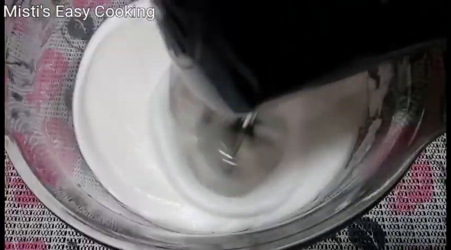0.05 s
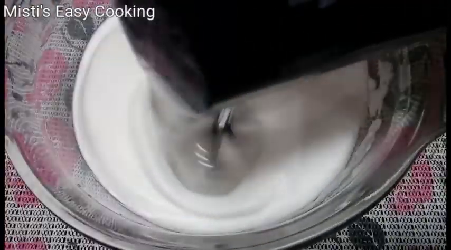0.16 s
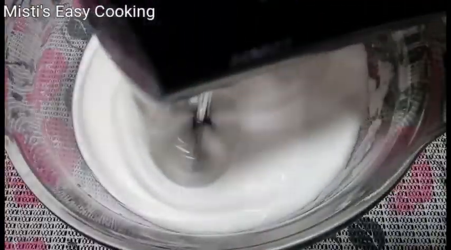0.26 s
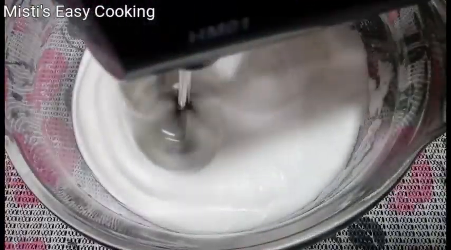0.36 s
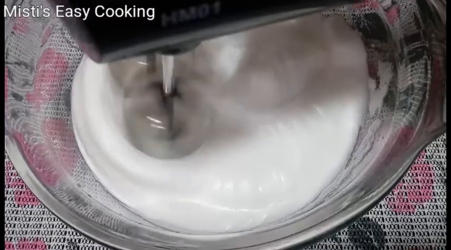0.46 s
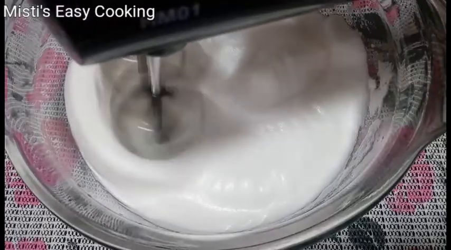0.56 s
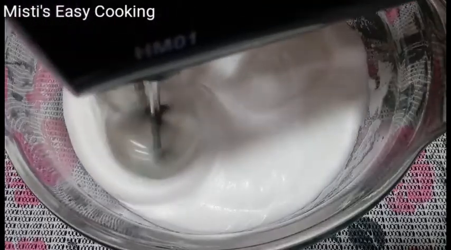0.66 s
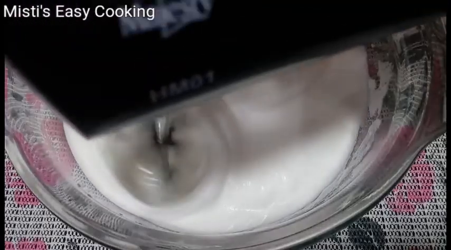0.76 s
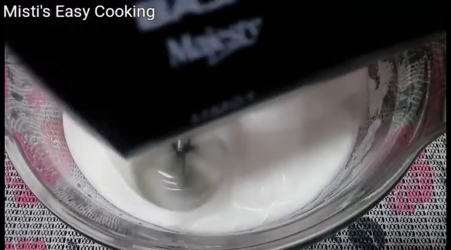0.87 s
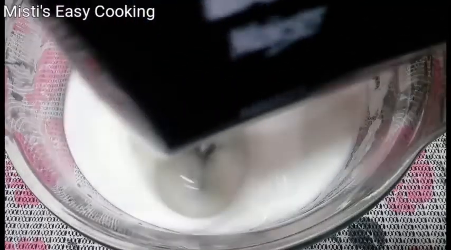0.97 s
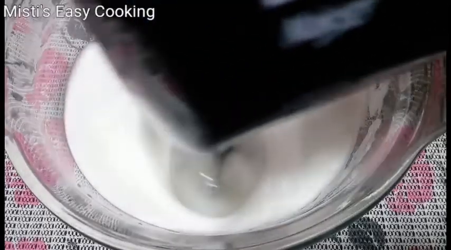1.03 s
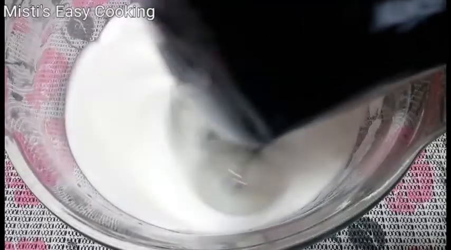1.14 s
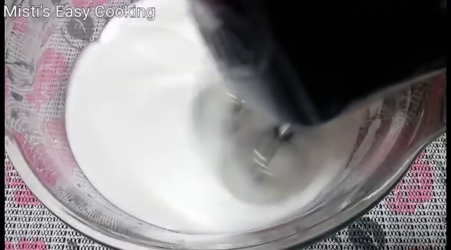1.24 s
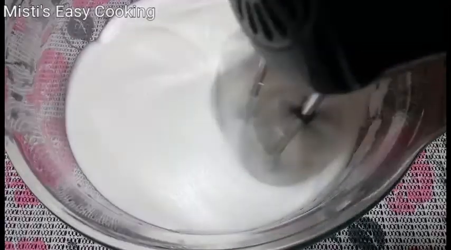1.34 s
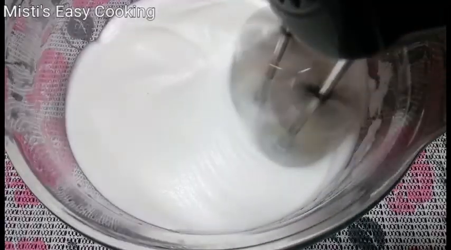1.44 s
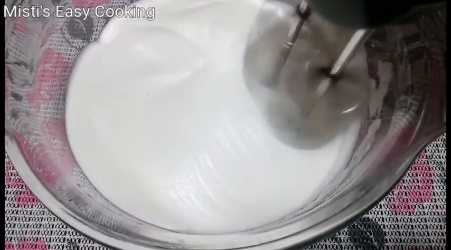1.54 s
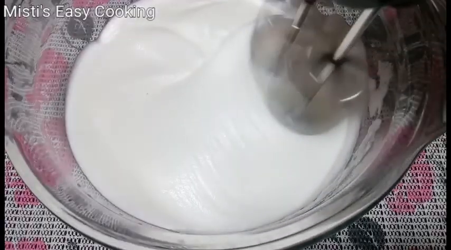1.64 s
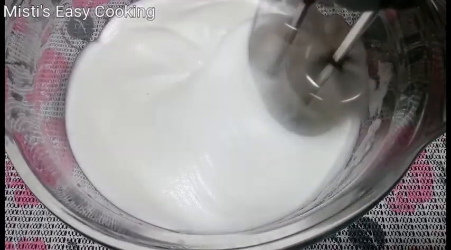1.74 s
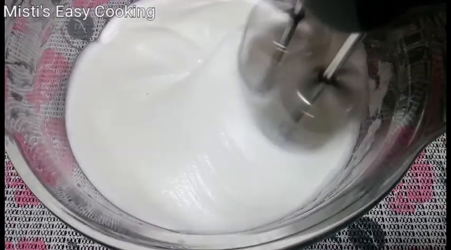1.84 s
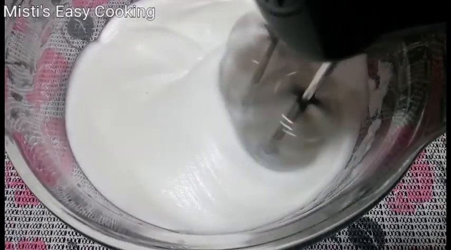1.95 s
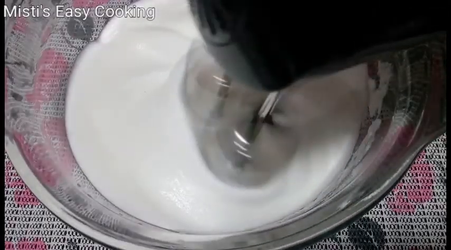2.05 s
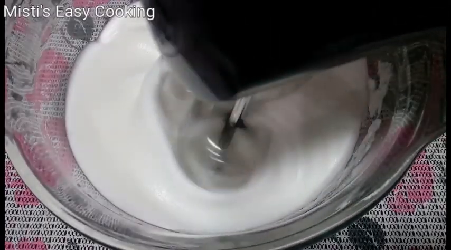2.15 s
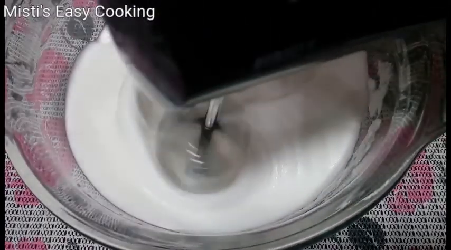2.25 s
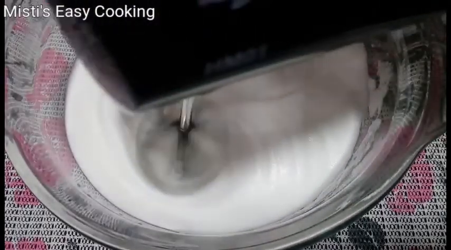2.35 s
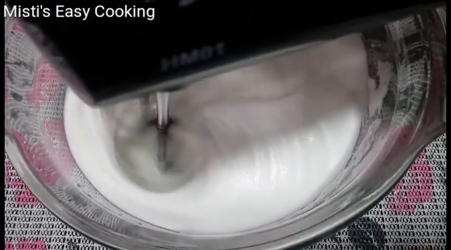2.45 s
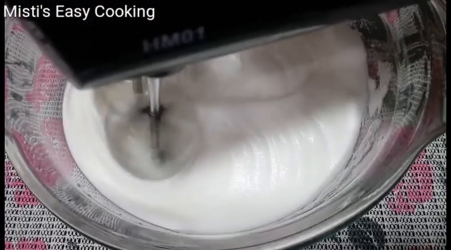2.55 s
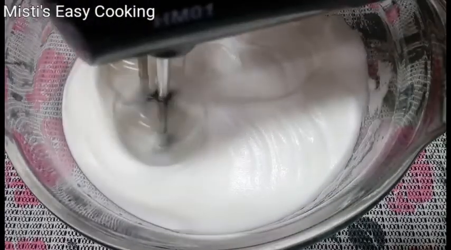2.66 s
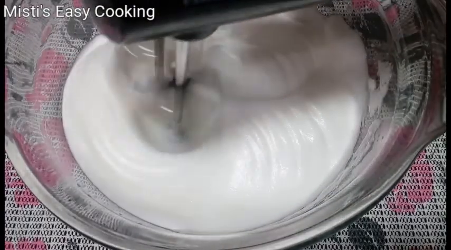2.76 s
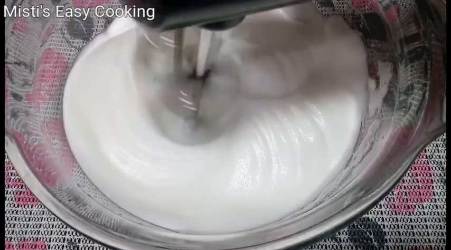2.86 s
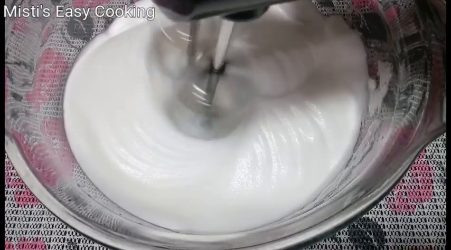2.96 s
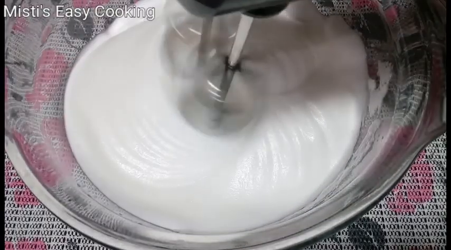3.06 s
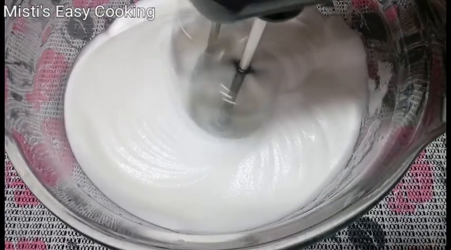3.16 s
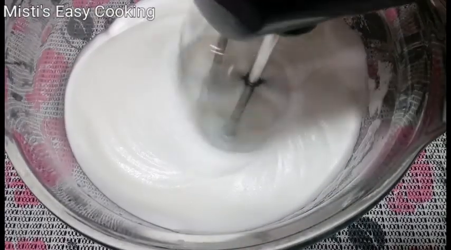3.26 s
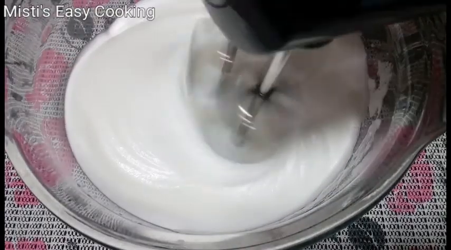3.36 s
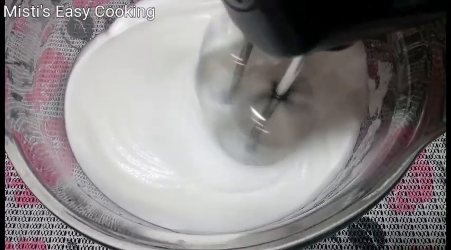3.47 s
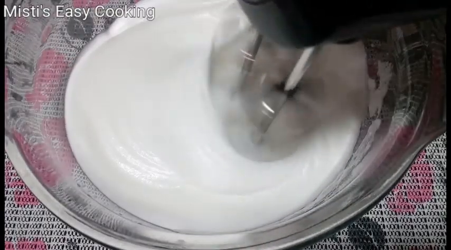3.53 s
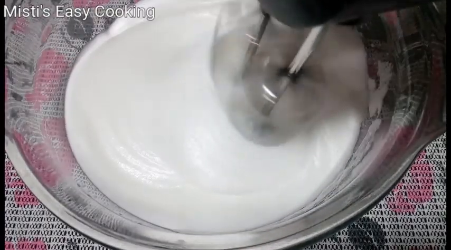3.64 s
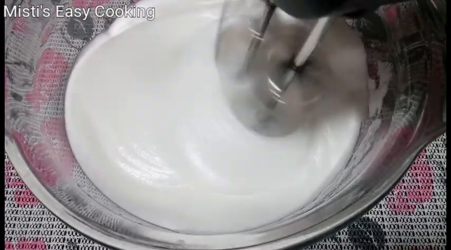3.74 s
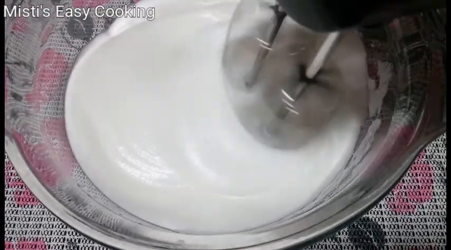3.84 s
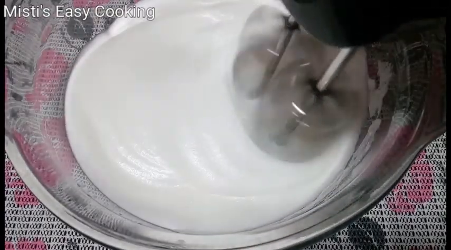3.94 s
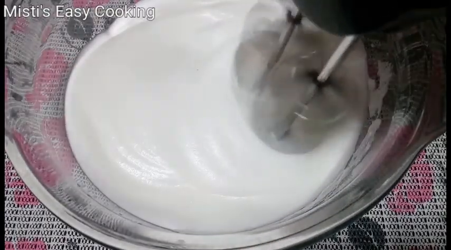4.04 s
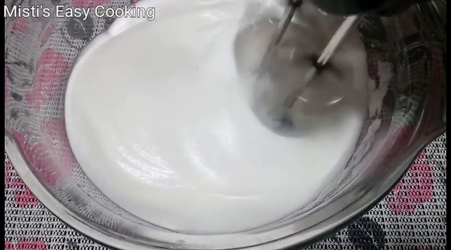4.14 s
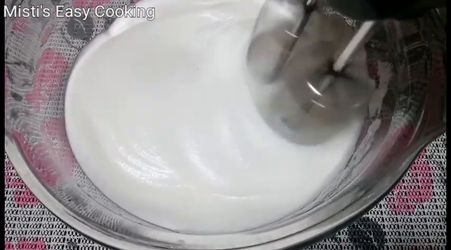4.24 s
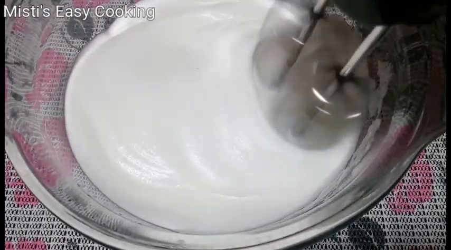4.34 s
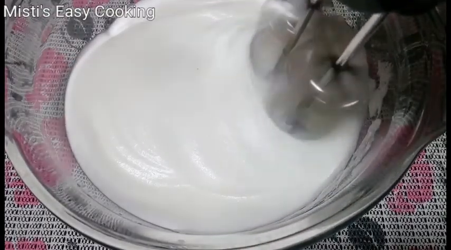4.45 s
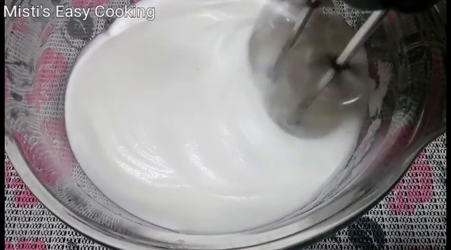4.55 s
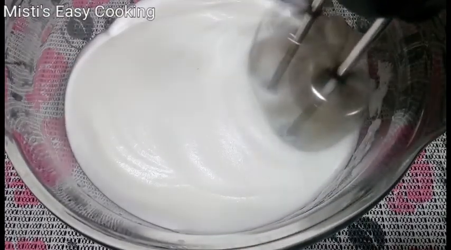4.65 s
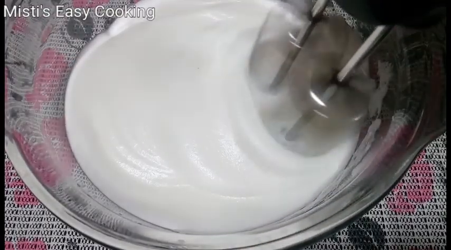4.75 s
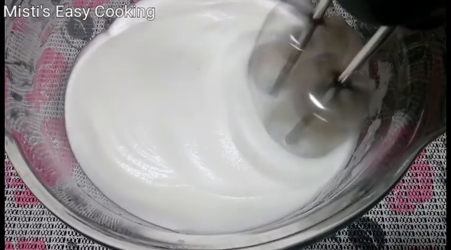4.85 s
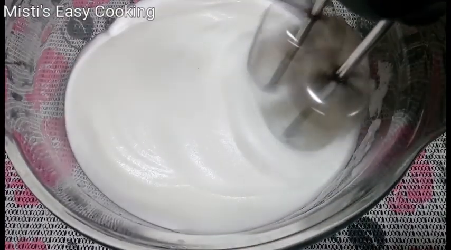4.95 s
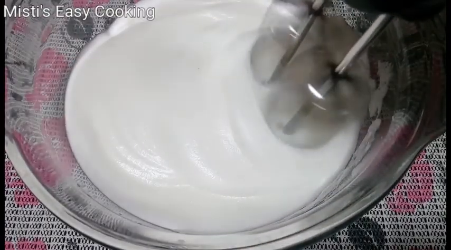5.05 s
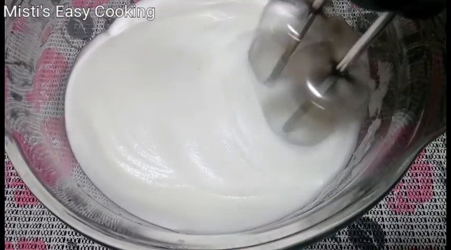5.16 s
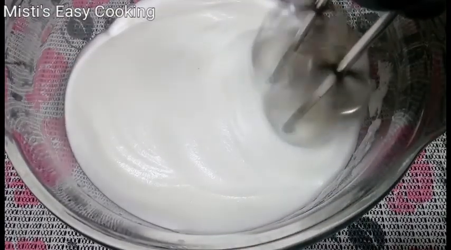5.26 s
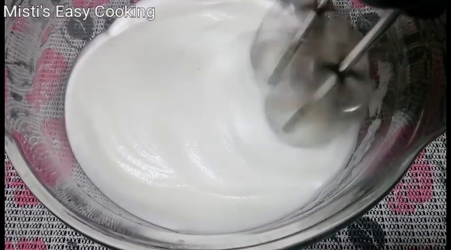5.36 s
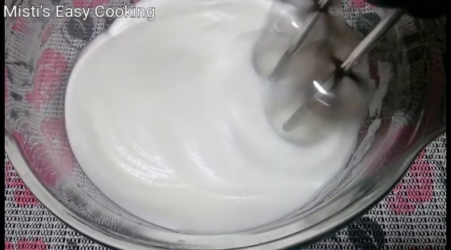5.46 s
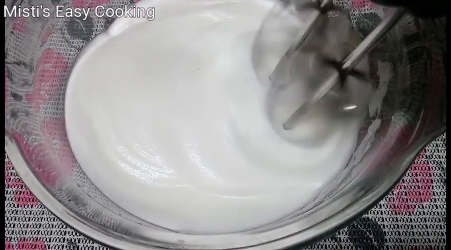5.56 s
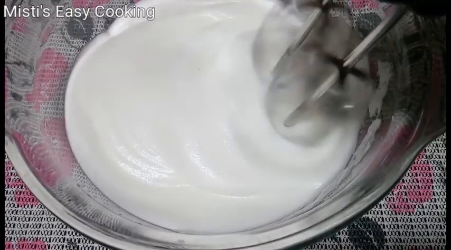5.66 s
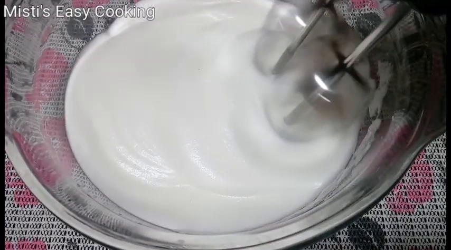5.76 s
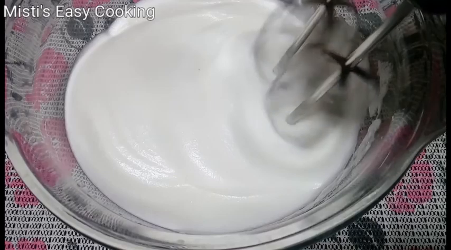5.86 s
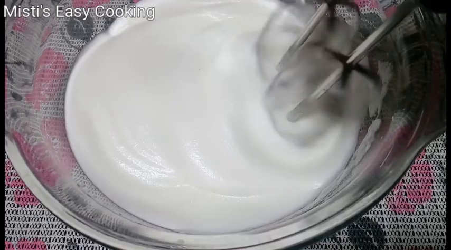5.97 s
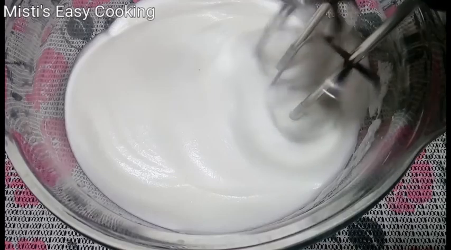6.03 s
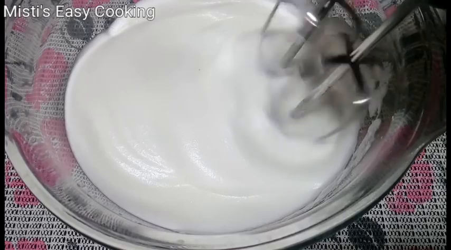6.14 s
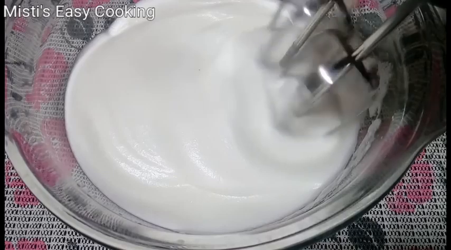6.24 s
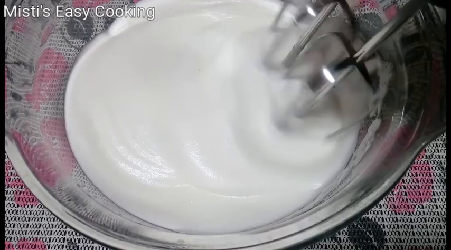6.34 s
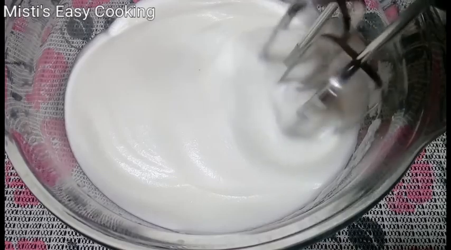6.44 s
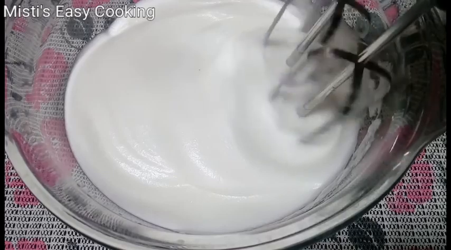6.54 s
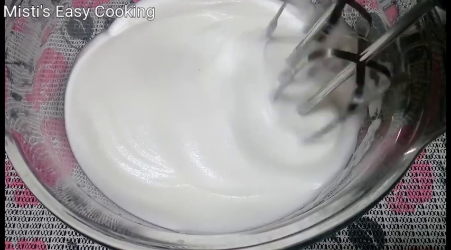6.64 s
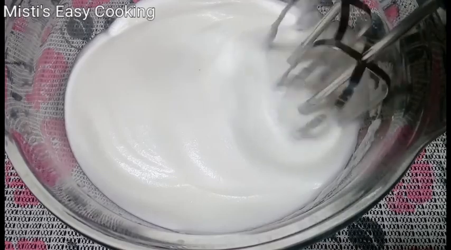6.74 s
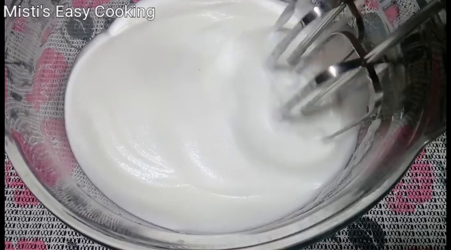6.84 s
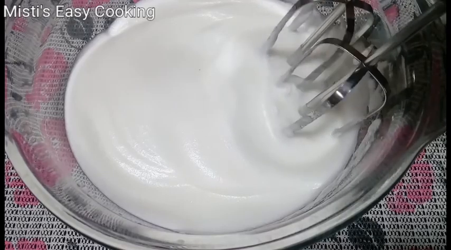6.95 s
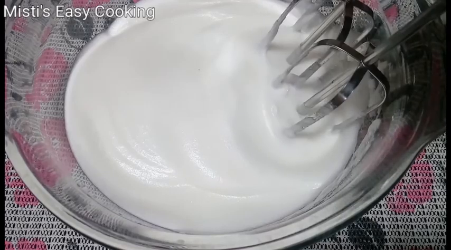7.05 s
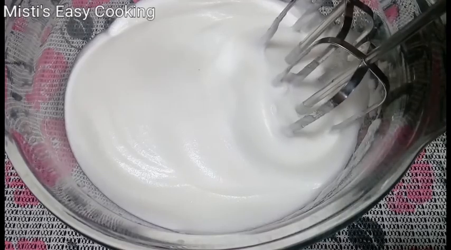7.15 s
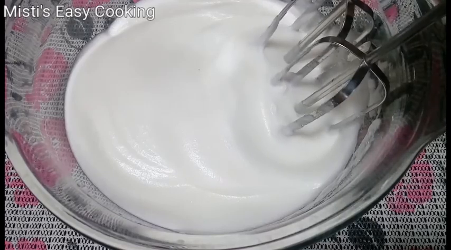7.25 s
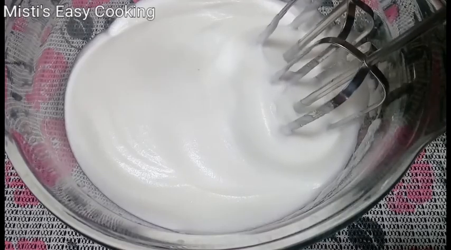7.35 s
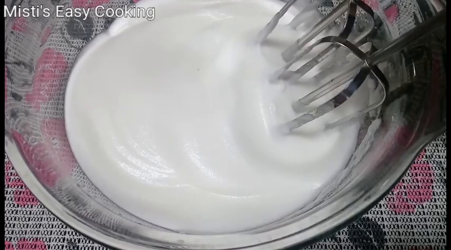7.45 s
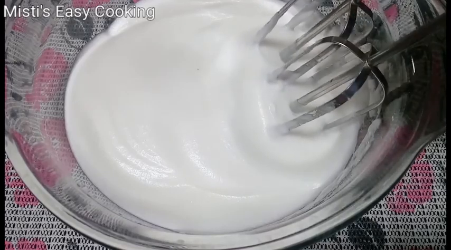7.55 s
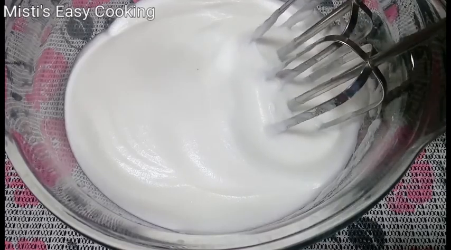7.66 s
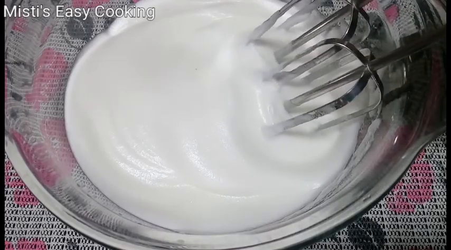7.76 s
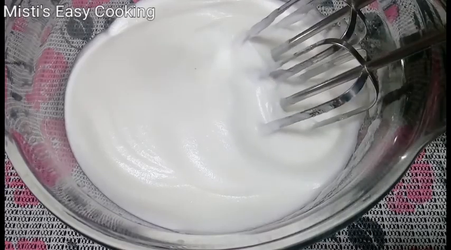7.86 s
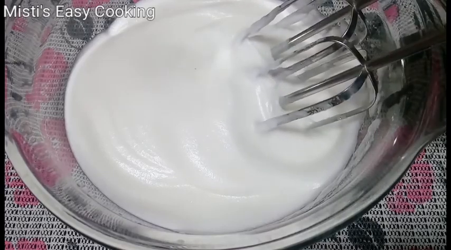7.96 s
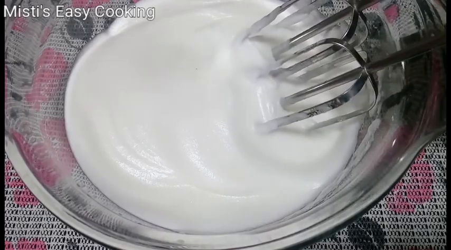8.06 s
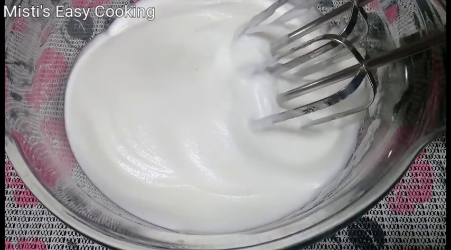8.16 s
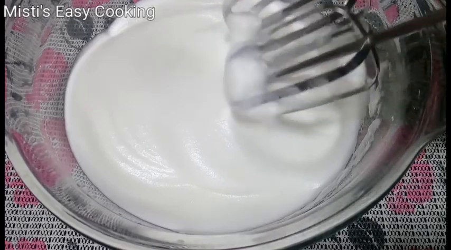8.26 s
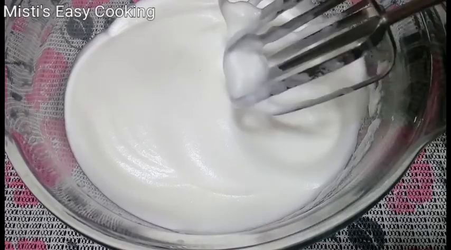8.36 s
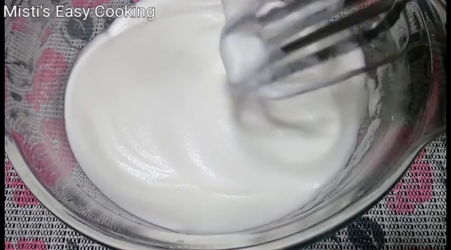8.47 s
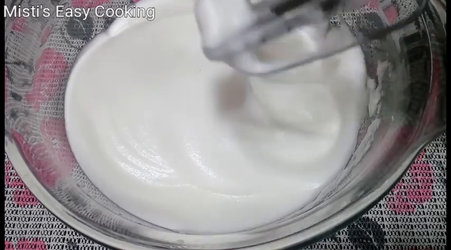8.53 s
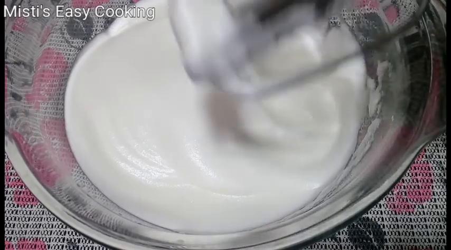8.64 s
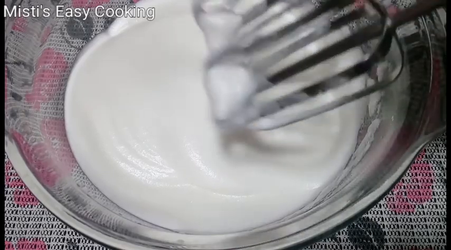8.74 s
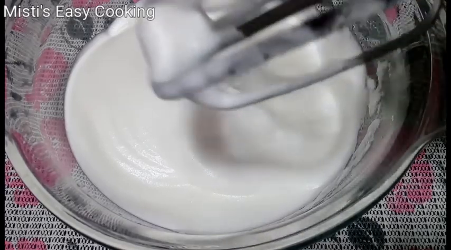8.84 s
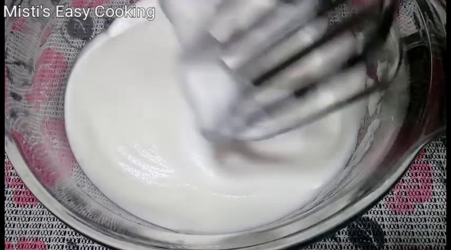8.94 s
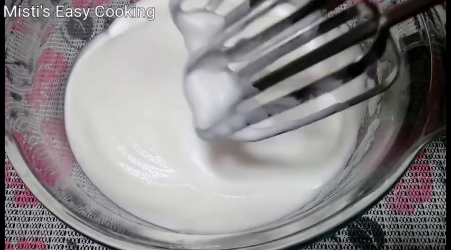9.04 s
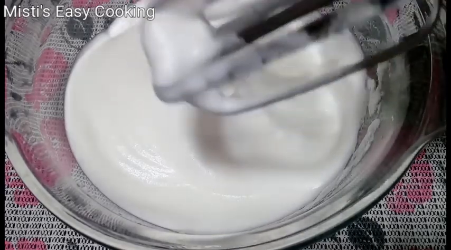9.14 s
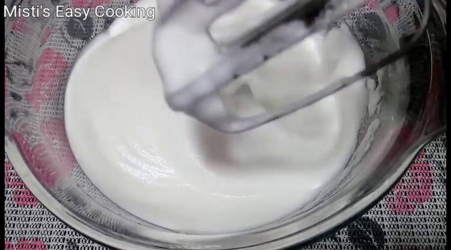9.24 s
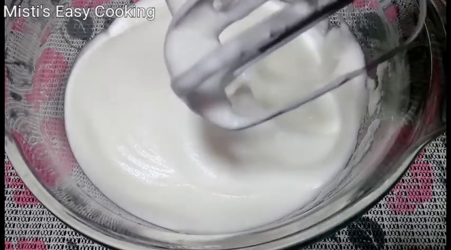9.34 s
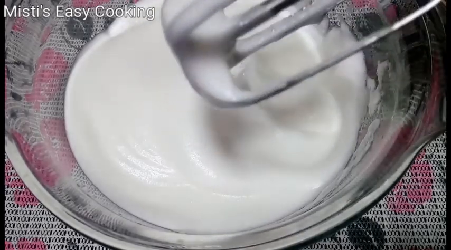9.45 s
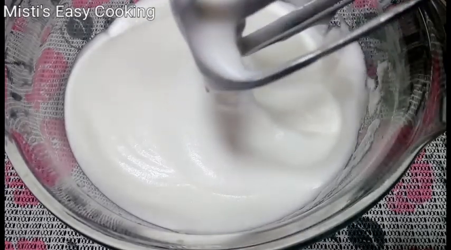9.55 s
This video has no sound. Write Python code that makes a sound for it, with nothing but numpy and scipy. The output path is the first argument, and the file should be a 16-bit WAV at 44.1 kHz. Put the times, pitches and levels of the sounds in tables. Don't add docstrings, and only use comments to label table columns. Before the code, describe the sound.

Close in a small kitchen, an electric hand mixer runs for about five seconds with a steady buzzing whine, gear whirr, rushing fan air and soft churning of thick cream. Switched off, its tones slide down over two seconds. Slowing beaters clink quickly on the bowl, then one sharper tap rings out. Faint handling ticks follow over quiet room hum, heard in stereo from near microphones.

```python
import sys
import numpy as np
from scipy import signal
from scipy.fft import rfft, irfft
from scipy.io import wavfile
from scipy.ndimage import uniform_filter1d, map_coordinates

SR = 44100
rng = np.random.default_rng(int(sys.argv[2]) if len(sys.argv) > 2 else 0)


def ratio_of_db(decibels):
    return 10 ** (np.asarray(decibels, float) / 20)


def log_audio(samples):
    frames = np.atleast_2d(samples).T
    limited = np.clip(frames, -1, 1)
    pcm = np.round(limited * 32767).astype(np.int16)
    wavfile.write(sys.argv[1], SR, pcm)


N = 423359


def evened(x):
    return x / np.sqrt(np.mean(abs(x) ** 2) + 1e-20)


def read(points, hz):
    f, value = np.transpose(points)
    return np.interp(np.log(hz + 1), np.log(f + 1), value)


def curves(rows, t):
    s, *columns = np.transpose(rows)
    return [np.interp(t, s, c) for c in columns]


def add(mix, s, sound):
    part = mix[:, round(s * SR):][:, :sound.shape[1]]
    part += sound[:, :part.shape[1]]


def drift(per_s, rows):
    knots = rng.standard_normal((rows, 400))
    at = np.arange(N) / SR * per_s
    return np.array([map_coordinates(k, [at], order=3) for k in knots])


def peak(hz, centre_hz, width_hz):
    return 1 / (1 + (2 * (hz - centre_hz) / width_hz) ** 2)


def resonances(hz, rows):
    return sum(db * peak(hz, centre_hz, width_hz) for centre_hz, width_hz, db in rows)


def grid():
    return (np.arange(N // 256 + 5) * 256 / SR)[None], np.fft.rfftfreq(1024, 1 / SR)[:, None]


def shape(points, hz, lo_hz, hi_hz):
    gain = ratio_of_db(read(points, hz))
    inside = (hz > lo_hz) & (hz < hi_hz)
    return gain / np.sqrt(np.sum(gain[inside] ** 2)) * 0.93


def noise(gain, same, lag, patchy_db):
    t, hz = grid()
    a, b, c, d, patch = rng.standard_normal((t.size, hz.size, 5)).T
    patch = uniform_filter1d(patch, size=8, axis=0)
    patch = evened(uniform_filter1d(patch, size=16, axis=1))
    same = np.clip(read(same, hz), 0, 1)
    right = a + 1j * b
    left = same * right + np.sqrt(1 - same ** 2) * (c + 1j * d)
    left = left * np.exp(-2j * np.pi * hz * lag / SR)
    z = np.array([left, right]) * gain * ratio_of_db(patchy_db * patch)
    return signal.istft(z, nperseg=1024, noverlap=768)[1][:, :N]


# (time [s], speed [Hz])
LOADED_SPEED = [(0, 387.2), (.45, 387), (.85, 386.2), (1.3, 384.6), (2.05, 385.3), (2.5, 385.2),
                (2.9, 384.8), (3.85, 384.7), (4.05, 385.5), (4.7, 385.4), (5.06, 386.2)]
# (time [s], speed change [Hz])
COASTING_SWAY = [(5.064, 0), (5.3, .5), (5.45, -.6), (5.75, -.7), (5.95, .9), (6.2, .7), (6.35, 0),
                 (6.7, -.55), (7, -.4)]
FULL_HZ, STOP_HZ = 386.2, 8


def shaft(t):
    off_s, drag_hz, drag_shift_hz, drag_per_s = 5.064, 322.9, 46.7, .4415
    driven = curves(LOADED_SPEED, t)[0]
    angle = np.arctan((FULL_HZ - drag_shift_hz) / drag_hz) - drag_per_s * np.clip(t - off_s, 0, 3)
    coasting = drag_hz * np.tan(angle) + drag_shift_hz + curves(COASTING_SWAY, t)[0]
    return np.where(t < off_s, driven, np.maximum(coasting, STOP_HZ))


def tone(speed, order, db, pan_db, lead, waver, flare_db=0.):
    turn = 2 * np.pi * np.cumsum(speed) / SR
    wobble = drift(18, rows=4) * waver
    flare = ratio_of_db(flare_db * (drift(22, rows=2) + 0.26))
    left = ratio_of_db(db + pan_db) * np.sin(order * turn + lead + wobble[0]) * (1 + wobble[1])
    right = ratio_of_db(db) * np.sin(order * turn + wobble[2]) * (1 + wobble[3])
    return np.sqrt(2) * (order * speed < 11700) * flare * np.array([left, right])


def glint(hz, rows, share=1):
    dull_hz, dull_db_per_octave = 6840, -75
    return share * resonances(hz, rows) + dull_db_per_octave * np.log2(np.maximum(hz / dull_hz, 1))


def imbalance(speed, near_db):
    decades = np.log10(speed / FULL_HZ)
    shaft_db = -30.5 + near_db + 31 * decades - 150 * np.log10(np.hypot(1, 115 / speed))
    shaft_db = shaft_db + 13.8 * peak(speed, 338.4, 45) + 6.0 * peak(speed, 215, 50)
    shaft_db = shaft_db - 4 * peak(speed, 190, 12) - 4 * peak(speed, 326, 12)
    out = tone(speed, order=1, db=shaft_db, pan_db=1.5, lead=0.54, waver=0.021)
    gear_db = -43.5 + near_db + 58 * decades
    out += tone(speed, order=10 / 11, db=gear_db, pan_db=-1.5, lead=0.44, waver=0.42)
    octave_db = -46.0 + 18 * decades - 60 * np.log10(np.hypot(1, 75 / speed))
    octave_db = octave_db + 19.8 * peak(2 * speed, 421, 120) + 6.0 * peak(2 * speed, 300, 70)
    octave_db = octave_db - 15 * peak(2 * speed, 375, 15) - 12 * peak(2 * speed, 230, 90)
    return out + tone(speed, order=2, db=octave_db, pan_db=3, lead=0.92, waver=0.046)


# (time [s], blade tone right [dB], left-right [dB], left lead [rad])
GRILLE_FACING = [(.05, -25, -21, 0), (.25, -22, -26.5, 0.5), (.5, -22.5, -6.5, 0.6), (.85, -25.5, 8.5, 3),
                 (1.25, -29, -14.5, -0.5), (1.65, -22, -10, 7), (1.9, -20.5, -17.5, 2),
                 (2.25, -22.5, -17.5, 1), (2.45, -20.5, -5, 4), (2.65, -31, 10, 2),
                 (2.85, -20.5, -11.5, 3.5), (3.05, -17.5, -22.5, 0.7), (3.25, -19.5, -11.5, -4),
                 (3.85, -19, -18, 1), (4.2, -19, -14, -5.5), (4.65, -20, -8.5, -3.5), (4.85, -21, -8.5, -5),
                 (5.1, -22.5, -7, -1.5)]
# (centre [Hz], width [Hz], lift [dB])
BLADE_GLINTS = [(1090, 350, -10), (1730, 140, 1.5), (1888, 720, 11.5), (2305, 200, 4), (2520, 160, -8.5),
                (2920, 180, 8.5), (3170, 200, -12.5), (3880, 1200, 8.5), (4465, 200, -2), (5150, 330, 4.5),
                (6040, 260, -8.5), (6630, 330, 3), (6800, 270, -11.5), (7195, 160, 3), (7790, 270, -5.5)]
# (centre [Hz], width [Hz], lift [dB])
TWICE_BLADE_GAPS = [(2800, 250, 8), (3300, 200, 6), (3630, 180, 6.5), (3940, 150, -9.5), (4120, 150, 3),
                    (4450, 200, -6.5), (4680, 180, 5), (5950, 200, -4.5), (6800, 200, -8)]


def fan(speed):
    decades = np.log10(speed / FULL_HZ)
    fan_db, fan_pan_db, fan_lead = curves(GRILLE_FACING, np.arange(N) / SR)
    fan_db = fan_db + 31.6 * decades + glint(10 * speed, BLADE_GLINTS) - glint(10 * FULL_HZ, BLADE_GLINTS)
    fan_db = fan_db + 5 * peak(speed, 350, 22) - 7 * peak(speed, 374, 12) + 4 * peak(speed, 292, 25)
    fan_pan_db = fan_pan_db * speed / FULL_HZ - 9 * peak(speed, 240, 130)
    out = tone(speed, order=10, db=fan_db, pan_db=fan_pan_db, lead=fan_lead, waver=0.089)
    turned = peak(20 * speed, 5500, 1900)
    twice_db = -20.5 + 73 * decades + glint(20 * speed, BLADE_GLINTS, 1.4)
    twice_db = twice_db + 4 * turned + resonances(20 * speed, TWICE_BLADE_GAPS)
    lead = .3 + np.clip((4800 - 20 * speed) / 600, 0, 1.9)
    return out + tone(speed, order=20, db=twice_db, pan_db=-3.5 - 18 * turned, lead=lead,
                      waver=.25, flare_db=1.8)


# (order [multiple of shaft], level at full speed [dB], slope [dB per decade of speed],
# spacing at which the microphones agree [Hz], shading of the right by the hand near 6 kHz [dB])
BAR_TONES = [(24, -30.5, 20, 1050, 3), (48, -10, 54, 11000, 7), (72, -5.5, 55, 3200, 11)]
# (centre [Hz], width [Hz], lift [dB])
WALL_GLINTS = [(543, 300, -15), (1300, 600, -2.5), (1800, 170, -9.5), (2140, 200, -1), (2400, 198, -12),
               (2710, 420, 7.5), (3377, 250, -10), (4005, 420, 6.5), (4270, 120, -4.5), (4650, 300, 0),
               (4950, 200, -6.5), (5650, 150, -2.5), (6000, 400, -1), (6700, 300, -1), (7890, 500, -5),
               (9250, 300, 7.5)]


def commutator(speed):
    out = np.zeros((2, N))
    for order, db, slope_db, agree_hz, shade_db in BAR_TONES:
        hz = order * speed
        shade_db = shade_db * peak(hz, 6250, 900)
        bar_db = db + slope_db * np.log10(speed / FULL_HZ) + glint(hz, WALL_GLINTS) - shade_db
        lead = 2 * np.pi * (np.maximum(hz, 2950) - 4000) / agree_hz
        out += tone(speed, order=order, db=bar_db, pan_db=shade_db - 1.5, lead=lead, waver=.34, flare_db=1.5)
    return out


# (order [multiple of shaft], level at full speed [dB])
BEARING_ORDERS = [(3, -41.5), (4, -46.5), (5, -44), (7, -40), (9, -42), (16, -48)]


def bearings(speed):
    out = np.zeros((2, N))
    for order, db in BEARING_ORDERS:
        out += tone(speed, order=round(order), db=db + 45 * np.log10(speed / FULL_HZ), pan_db=-3, lead=1.5,
                    waver=.25, flare_db=2.5)
    return out


# (time [s], left lag [samples], left-right [dB],
# extra path of the bounce off the bowl [ms], nearness [dB])
HAND_PLACE = [(0, 9.4, -5.5, 0.97, -0.5), (.3, 13, -4, 0.98, 1), (.6, 14.2, -3.5, 0.97, 2),
              (.9, 14, -1, 0.97, 3), (1.2, 17.1, -5.5, 0.99, 2), (1.7, 5, -6, 1.02, -1.5),
              (2.3, 10.5, -6, 1.04, 1), (2.6, 15.4, -3.5, 1.03, 2), (3, 12.3, -2, 1.1, 1),
              (3.4, 11, -3, 1.07, 1), (4, 8.1, -4.5, 1.08, 0), (4.6, 5.1, -5.5, 1.12, 0),
              (5.5, 5.4, -5.5, 1.02, 1), (6.6, 5.3, -1, 3.3, 4.1), (7.6, 7.9, 1, 1, 20)]


def motor():
    t = np.arange(N) / SR
    speed, near_db = shaft(t), curves(HAND_PLACE, t)[3]
    out = imbalance(speed, near_db) + fan(speed) + commutator(speed) + bearings(speed)
    return out * (speed > STOP_HZ)


def halt_db(t):
    return -60 * np.maximum(t - 7.15, 0)


# (frequency [Hz], density [dB per Hz])
AIR_SPECTRUM = [(900, -32.5), (1500, -9.5), (1900, 2), (2250, -0.5), (2700, 2.5), (3400, 0), (4400, -1),
                (6200, -1.5), (7000, -5), (8000, -14.5), (10500, -18), (11800, -36.5)]


def cooling_air(t, hz, speed, near_db):
    air_db = -24.5 + 25.5 * np.log10(speed / FULL_HZ) + halt_db(t)
    housing = np.clip((4000 - hz) / 1200, 0, 1)
    housing_db = -1 + 0.38 * near_db
    air = shape(AIR_SPECTRUM, hz, 4140, 7400) * ratio_of_db(air_db + housing * housing_db + 3.0)
    slide_s, slide_length_s, slide_db = 7.45, .09, -54.5
    slide = shape(AIR_SPECTRUM, hz, 4180, 7400) * peak(hz, 1900, 1450) * ratio_of_db(slide_db)
    return air + slide * np.exp(-((t - slide_s) / slide_length_s) ** 2)


# (frequency [Hz], density [dB per Hz])
GEAR_SPECTRUM = [(200, -37), (350, 1.5), (450, -5.5), (575, -4), (640, -5), (850, 0), (980, -1.5),
                 (1250, 3.5), (1550, -3.5), (2200, -59.5)]


def gear_whirr(t, hz, speed, near_db):
    knee_hz, slowed = 188, 1 - speed / FULL_HZ
    gear_db = -26 + 0.77 * near_db - 48 * np.log10(np.hypot(1, knee_hz / speed)) + halt_db(t)
    gear_db = gear_db + 14.5 * slowed * peak(hz, 600, 130)
    gear_db = gear_db - 10.5 * slowed * peak(hz, 290, 130)
    return shape(GEAR_SPECTRUM, hz, 450, 1500) * ratio_of_db(gear_db)


# (frequency [Hz], density [dB per Hz])
CREAM_SPECTRUM = [(25, -4), (100, -31.5), (140, -24), (200, 2.5), (260, -4.5), (350, 5.5), (500, -20),
                  (900, -59)]


def whipped_cream(t, hz, speed, near_db):
    cream_db = -53 + 0.58 * near_db + 21.5 * np.log10(speed / FULL_HZ) + halt_db(t)
    cream_db = cream_db + 10.5 * peak(speed, 273, 110)
    slaps = uniform_filter1d(rng.exponential(1, t.shape) ** 2.4, size=4, axis=1)
    return shape(CREAM_SPECTRUM, hz, 120, 330) * ratio_of_db(cream_db + 3) * evened(.6 + np.sqrt(slaps))


# (centre [Hz], width [Hz], lift [dB])
CASE_MODES = [(351, 13, 2), (559.5, 34, 5.5), (700, 14, 6.5), (841, 62, 4), (961, 29, 6.5), (1698, 42, 8),
              (2140, 100, -2.5), (3160, 270, -2), (6500, 110, 1.5)]
# (frequency [Hz], coherence [0-1])
MIXER_COHERENCE = [(60, .2), (130, .8), (270, .96), (520, .9), (750, .66), (1000, .76), (1300, .72),
                   (1800, .5), (2300, .42), (3000, .52), (6000, .38), (11000, .2)]
# (frequency [Hz], left-right [dB])
WALL_BALANCE = [(30, -4.5), (130, 2.5), (500, -1), (750, -5.5), (1000, 4.5), (1200, 0.5), (1500, -2.5),
                (1750, 0.5), (2200, -1.5), (3000, 0)]
# (frequency [Hz], left lead [rad])
WALL_PHASE = [(500, 0), (750, .2), (1000, -.4), (1150, -1.9), (1450, -1.55), (1750, -2.8), (2200, -1.1),
              (2700, 0)]
# (frequency [Hz], share of the lag [0-1])
AIRBORNE_LAG = [(1050, .17), (1200, .55), (1800, .55), (2400, 1)]
# (shaft speed [Hz], its width [Hz], band [Hz], its width [Hz], lift [dB])
CASE_RATTLE = [(228, 80, 1300, 550, 4.5), (240, 110, 1800, 860, 5), (109.6, 66, 1600, 1600, -1),
               (150, 55, 700, 400, 2.5), (70, 46, 870, 500, -4.5), (80, 60, 3200, 2000, -1.5),
               (110, 90, 7700, 2500, -4.5), (60, 80, 80, 100, -3.5)]


def rush():
    t, hz = grid()
    lag, pan_db, path_ms, near_db = curves(HAND_PLACE, t)
    speed = shaft(t)
    air = cooling_air(t, hz, speed, near_db)
    cream = whipped_cream(t, hz, speed, near_db)
    gears = gear_whirr(t, hz, speed, near_db)
    path_s = path_ms * np.array([.9, 1.1])[:, None, None] / 1000
    comb = 1 + 0.1 * np.exp(-2j * np.pi * hz * path_s)
    treble = np.clip((hz - 1200) / 800, 0, 1)
    side = ratio_of_db((pan_db * treble + read(WALL_BALANCE, hz)) / 2)
    ears = np.array([side * np.exp(1j * read(WALL_PHASE, hz)), 1 / side])
    rattle_db = sum(db * peak(speed, at_hz, span_hz) * peak(hz, band_hz, width_hz)
                    for at_hz, span_hz, band_hz, width_hz, db in CASE_RATTLE)
    gain = np.sqrt(air ** 2 + cream ** 2 + gears ** 2) * comb * ears * ratio_of_db(1.24 + rattle_db)
    out = noise(gain, MIXER_COHERENCE, lag * read(AIRBORNE_LAG, hz), 0.96)
    size = N + SR + 1
    lift_db = resonances(np.fft.rfftfreq(size, 1 / SR), CASE_MODES)
    return irfft(rfft(out, size) * ratio_of_db(lift_db), size)[:, :N]


# (frequency [Hz], twin below by [Hz], left-right [dB], left lead [rad])
MODE_TONES = [(202, 23, .5, -.3), (345, 34, 2, 0), (770, 21, -7, 1), (1410, 80, 1, -2.4),
              (1800, 32, 4, 3.1), (2082, 3, 3, 1), (2945, 180, 0, 0), (3340, 1, -4.5, -1),
              (3417, 12, -5, -.9), (3546, 75, -4, -1), (3730, 10, -2, -1), (3789, 4, -1, -1),
              (4400, 20, 0, 0), (5325, 16, 2, .5), (5520, 30, 2, .9), (6203, 25, 2.5, 1.4),
              (7574, 45, 2, -2.6), (8090, 30, 0, 0), (8820, 100, 0, 0), (10200, 40, 0, 0),
              (11100, 60, -3, 3)]
# (t60 [s], level when clinked [dB], level at the last tap [dB],
# level ringing on after the first swing [dB])
MODE_ANSWERS = [(0.39, -1.5, -6.5, -1.5), (0.08, -1, -18, -1), (.55, -10.5, -27.5, -1),
                (.15, -12, -27, -8.5), (0.15, 4.5, -33, -0.5), (0.34, -2.5, -30, -4.5), (.3, -18, -36, -7),
                (0.44, 2.5, -0.5, -16.5), (.25, 4, 1.5, -20), (.07, -6.5, -2, -13), (0.28, -7, -17, 0),
                (0.33, -2, -12, -7), (.2, -25, -33, -8), (.38, -6, -25.5, -5), (0.4, 6.5, -31, -13),
                (.3, -4, -12.5, -10), (0.38, -21, -24.5, -7), (.2, -22, -34, -8), (.2, -8, -33, -11),
                (.3, -24, -39, -9), (0.09, -22, -65, 7)]


def ring(mode_db, spread_db):
    hz, twin_hz, pan_db, lead = np.transpose(MODE_TONES)[:, :, None]
    t60, _, _, after_db = np.transpose(MODE_ANSWERS)[:, :, None]
    t = np.arange(SR // 2) / SR
    luck = rng.standard_normal((len(MODE_ANSWERS), 4)) * np.minimum(hz / 1500, 1)
    size = ratio_of_db(mode_db + spread_db * luck[:, :1] - 60 * t / np.clip(t60, .03, .6))
    size = size * (1 - np.exp(-t * np.minimum(hz, 700)))
    first_swing_s = 0.0091
    size = size * (ratio_of_db(after_db) + np.exp(-t / first_swing_s))
    ears = []
    for side in (1, -1):
        upper = np.sin(2 * np.pi * hz * t + side * (lead / 2 + .2 * luck[:, [1]]))
        lower = .7 * np.sin(2 * np.pi * (hz - twin_hz) * t + side * (lead / 2 + .4 * luck[:, [2]]))
        level = size * ratio_of_db(side * (pan_db / 2 + .7 * luck[:, [3]]))
        ears.append((level * (upper + lower)).sum(0))
    return np.array(ears)


def crack(db, decay_s, lo_hz, hi_hz):
    t = np.arange(SR // 2) / SR
    one, own = rng.standard_normal(t.size), rng.standard_normal((2, t.size))
    band = signal.butter(2, [lo_hz, min(hi_hz, 15000)], "bandpass", fs=SR, output="sos")
    burst = evened(signal.sosfilt(band, one + 3.3 * own))
    return ratio_of_db(db) * signal.sosfilt(band, burst) * np.exp(-t / decay_s)


# (time [s], low wall [dB], high wall [dB], wire edge [dB], wire top [dB])
WALL_CLINKS = [
    (6.7646, -40, -36, -40, -41.5),
    (6.8488, -41, -35, -38.5, -39.5),
    (6.8744, -43.5, -60, -56.5, -41),
    (6.915, -64, -44, -65.5, -64),
    (6.9596, -40, -28.5, -38, -37),
    (7.0034, -50, -34.5, -49, -57),
    (7.0441, -35.5, -47, -42.5, -52),
    (7.0995, -55.5, -56, -63.5, -64),
    (7.134, -55, -46.5, -42.5, -40.5),
]
FAMILY_CENTRES = [800, 1790, 2080, 3340, 5450]
# (time [s], crack [dB], ring [dB])
LAST_TAP = [
    (8.029, -12.5, -21),
]


def clinks():
    out, answers = np.zeros((2, N)), np.array(MODE_ANSWERS)
    mode_hz = np.array(MODE_TONES)[:, :1]
    for s, low_db, high_db, edge_db, top_db in WALL_CLINKS:
        family_db = np.interp(mode_hz, FAMILY_CENTRES, [edge_db + 1, low_db, high_db, edge_db, top_db])
        contact = crack(edge_db + 9.5, 0.0037, 830, 8300)
        add(out, s, ring(answers[:, [1]] + family_db, 1.6) + contact)
    for s, crack_db, ring_db in LAST_TAP:
        contact = crack(crack_db - 18.5, 0.0053, 2700, 9000) + crack(crack_db - 3.0, 0.0037, 1080, 1420)
        sizzle = crack(crack_db - 31.5, .05, 900, 9000)
        add(out, s, ring(answers[:, [2]] + ring_db, 0) + contact + sizzle)
    return out


# (time [s], peak [dB], thud [dB], knock [Hz], treble [dB])
HANDLING_TICKS = [(6.64, -30, -52, 1510, -44), (7.0996, -36, -47, 1900, -53), (7.1201, -33, -51, 2070, -53),
                  (7.282, -43, -71, 1780, -52), (7.297, -47, -66, 1430, -47), (8.796, -51, -54, 1125, -72),
                  (8.842, -61, -60, 400, -75), (8.864, -50, -59, 547, -70.5),
                  (8.886, -53, -70.5, 501, -52.5), (8.895, -45, -61, 1170, -54),
                  (8.931, -47, -53, 923, -66.5), (9.148, -33, -53, 470, -55), (9.158, -43, -65, 1150, -64),
                  (9.19, -44.5, -69, 1300, -46), (9.256, -32, -41, 950, -50.5), (9.582, -42, -46, 897, -69)]
# (time [s], peak [dB])
FLOOR_BUMPS = [(1.012, -31.5), (1.841, -48), (2.3, -38.5), (2.462, -35.5), (3.247, -38.5), (3.97, -40),
               (4.196, -44), (4.417, -54), (4.696, -39), (4.981, -46), (5.153, -37), (5.354, -34)]


def ticks():
    out, pan_db = np.zeros((2, N)), 1
    for s, db, thud_db, hz, treble_db in HANDLING_TICKS:
        knock = crack(db + 0.19, 0.0044, hz / 1.9, hz * 2.3)
        thud = crack(thud_db + 3.0, 0.026, 110, 480)
        rustle = crack(db - 19, 0.025, 350, 4500)
        click = crack(treble_db + 5.5, 0.0014, 2500, 8200)
        add(out, s, (knock + thud + rustle + click) * ratio_of_db([[pan_db / 2], [-pan_db / 2]]))
    for s, db in FLOOR_BUMPS:
        add(out, s, crack(db + 3.5, 0.047, 165, 240).mean(0) * np.ones((2, 1)))
    return out


# (frequency [Hz], t60 [s])
KITCHEN_T60 = [(150, 0.49), (500, 0.37), (2000, 0.47), (8000, 0.14)]


def kitchen(x):
    taps = np.zeros((2, SR // 2))
    jitter = rng.integers(0, 20, (2, (SR // 2 - 201) // 20))
    at = np.arange(200, SR // 2 - 20, 20) + jitter
    np.put_along_axis(taps, at, rng.choice([-1., 1.], at.shape), 1)
    hz, t, z = signal.stft(taps, SR, nperseg=256)
    decay = ratio_of_db(-60 * t / read(KITCHEN_T60, hz)[:, None])
    tail = signal.istft(z * decay, SR, nperseg=256)[1]
    return signal.fftconvolve(x, tail / np.linalg.norm(tail[0]), axes=1)[:, :N]


# (frequency [Hz], density [dB per Hz])
HUM_SPECTRUM = [(25, -27.5), (90, -23.5), (200, -6), (290, -16), (400, -8), (550, -19.5), (800, -15.5),
                (1400, -22.5), (3000, -27), (6800, -31.5), (8200, -41.5), (10800, -47), (11800, -64)]
# (frequency [Hz], coherence [0-1])
HUM_COHERENCE = [(30, 0.2104), (130, 0.23), (300, 0.48), (800, .2), (3000, .05)]
# (time [s], gain [dB])
QUIET_GAIN = [(7.2, -1), (7.6, -1), (8, -0.5), (8.4, -2.5), (8.75, -5), (9.1, -3), (9.6, -3)]


def hum():
    t, hz = grid()
    hiss_db = -53.5 + curves(QUIET_GAIN, t)[0]
    drone_db = -61.5 + 3.5 * curves(QUIET_GAIN, np.arange(N) / SR)[0]
    band = signal.butter(2, [112, 160], "bandpass", fs=SR, output="sos")
    drone = ratio_of_db(drone_db) * evened(signal.sosfilt(band, rng.standard_normal(N)))
    return noise(shape(HUM_SPECTRUM, hz, 60, 8000) * ratio_of_db(hiss_db), HUM_COHERENCE, -10, 1.7) + drone


def scene():
    knocks, small = clinks(), ticks()
    airborne = signal.sosfilt(signal.butter(2, 450, "highpass", fs=SR, output="sos"), knocks)
    tail = kitchen(ratio_of_db(-15) * airborne + ratio_of_db(-8.0) * small)
    return rush() + motor() + knocks + small + tail + hum()


def top_cut(x):
    return signal.sosfilt(signal.butter(12, 11920, fs=SR, output="sos"), x)


def record(dry):
    fade = np.clip(0.71 + np.arange(N) / SR / 0.4, 0, 1)
    return top_cut(dry * fade)


dry = scene()
out = record(dry)
log_audio(out)
```